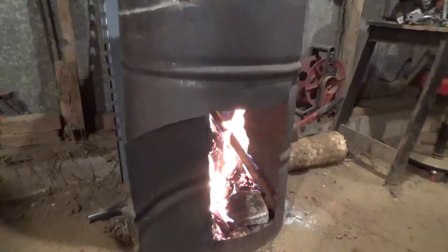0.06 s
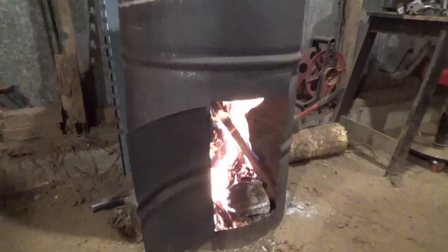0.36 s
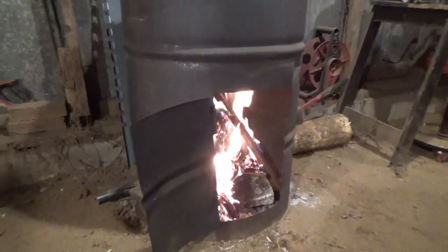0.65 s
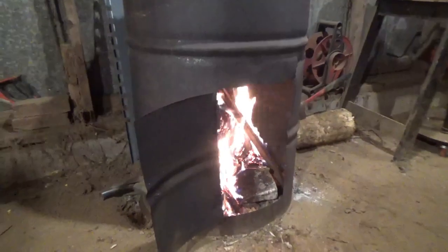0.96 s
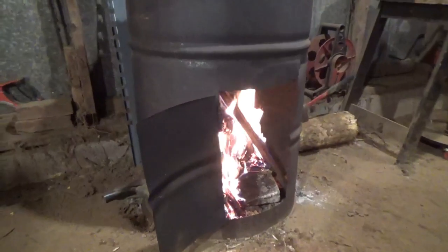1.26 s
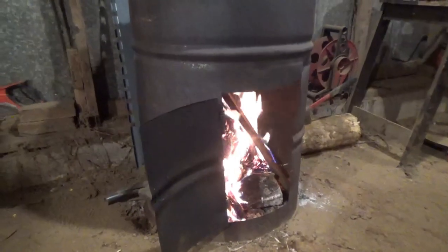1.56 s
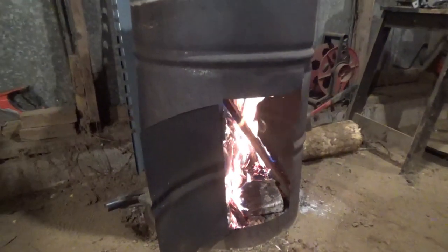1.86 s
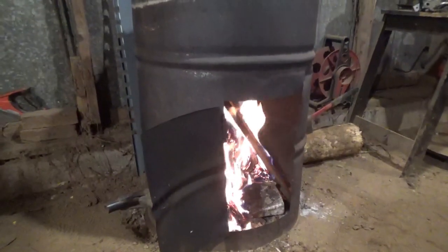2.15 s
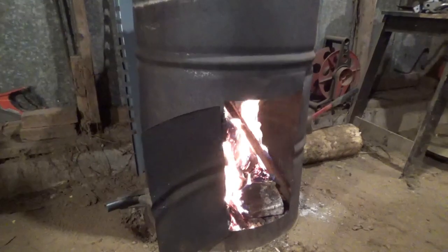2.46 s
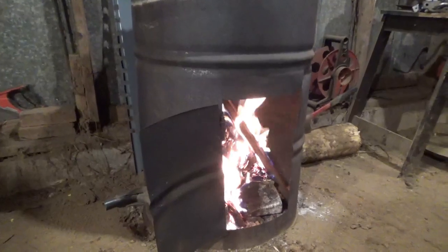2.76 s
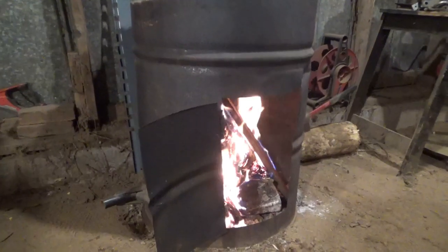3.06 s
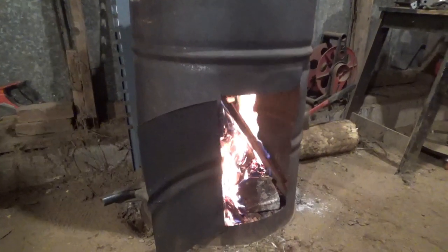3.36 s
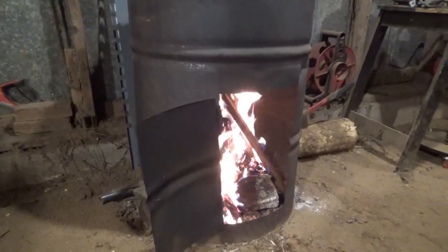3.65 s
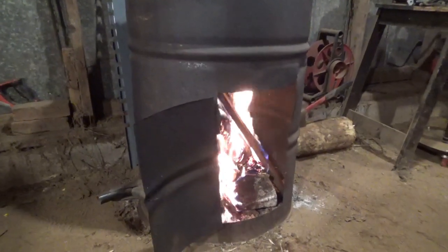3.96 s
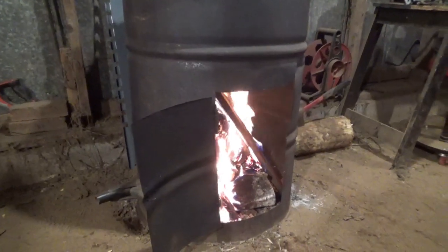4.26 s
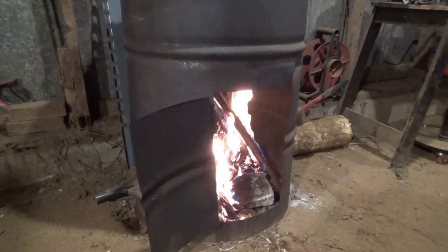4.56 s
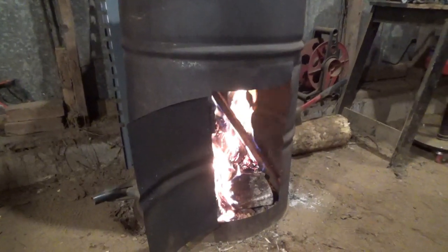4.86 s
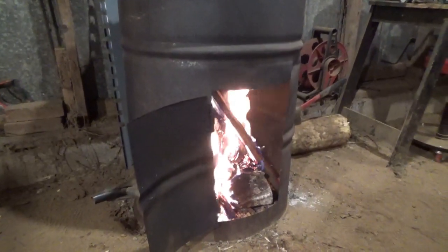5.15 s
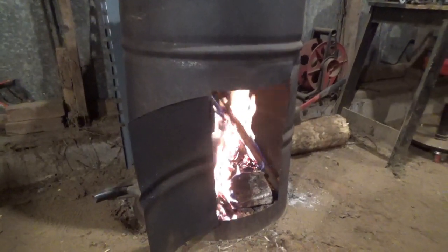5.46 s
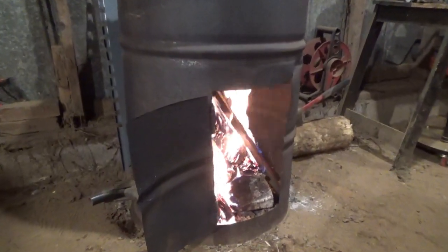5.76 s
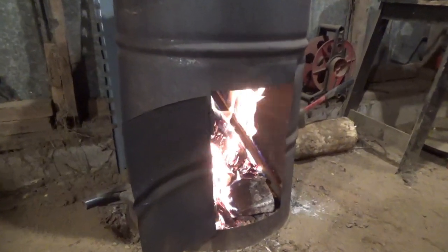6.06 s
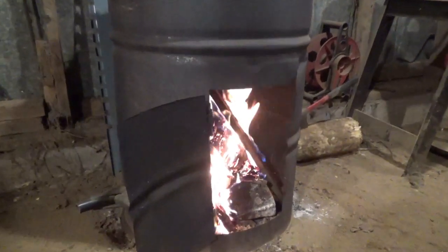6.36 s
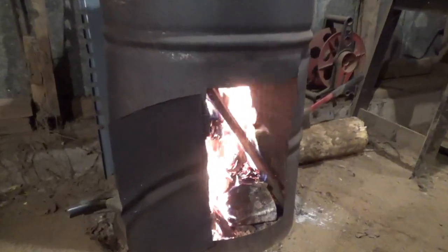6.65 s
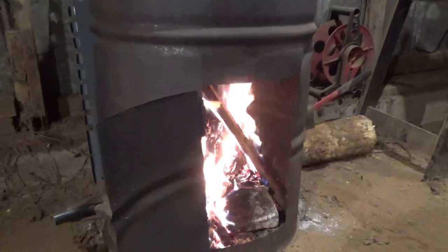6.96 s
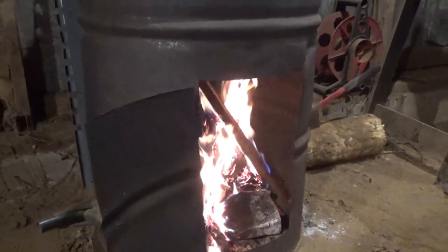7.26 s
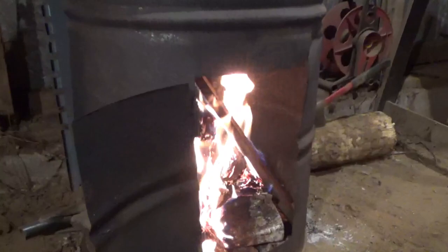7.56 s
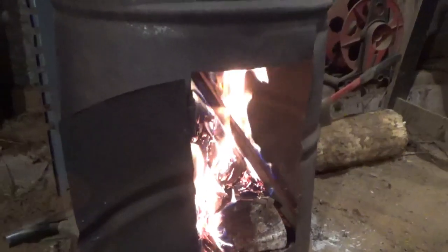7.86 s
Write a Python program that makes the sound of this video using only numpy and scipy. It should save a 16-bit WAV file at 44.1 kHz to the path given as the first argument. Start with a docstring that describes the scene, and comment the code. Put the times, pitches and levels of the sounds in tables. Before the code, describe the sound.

A wood fire burns in a steel drum stove in a workshop, a step from a stereo microphone. A very brief hollow rub opens the scene and stops dead. Throughout, the flames rush softly and the draught hums in the drum, under finely sizzling sap, ticking embers, small spits and a faint thin whine. Sharp, dry snaps stand far above this bed, each with a short echo from the drum and the room, the loudest slightly overloading. They cluster from about 0.5 to 1.5 seconds, return around 2.3 and 2.9, and come in a strong flurry from 3.4 to 3.8. Single pops follow near 4.4, 4.8, 5.9 and 6.2 seconds, then woodier knocks around 6.9 and a last loud group near 7.8. Escaping gas sings faintly in rough, slightly falling whistles, briefly at 3 seconds and then on and off from 4 seconds until almost 8.

```python
"""Sharp snaps of a wood fire, a step from the open door of a steel drum stove in a workshop.
Gas pockets burst in the logs, each with a short wash from the drum and the room, over small spits
and the fine crackle of sap and embers. The draught hums in the drum and escaping gas sings faintly.
A brief hollow rub opens the scene and a thin whine sits close to the stereo microphone,
which overloads on the loudest snaps."""
import sys
import numpy as np
from scipy import signal
from scipy.fft import rfft, irfft, next_fast_len
from scipy.io import wavfile
from scipy.ndimage import uniform_filter1d, minimum_filter1d, map_coordinates

SR = 44100
rng = np.random.default_rng(int(sys.argv[2]) if len(sys.argv) > 2 else 0)


def bounce(signal):
    """Save signal as a 16-bit WAV file at the path given by the first command-line argument."""
    frames = np.transpose(np.atleast_2d(signal))
    limited = np.clip(frames, -1, 1)
    pcm = np.round(limited * 32767).astype(np.int16)
    wavfile.write(sys.argv[1], SR, pcm)


N = 357033
BAND_HZ, TOP_HZ = 11050, 16000  # treble limits before and after the overload

# The larger bursts in the logs, in relative levels. Snap is the top treble, crack lies at 3-6 kHz, and body
# sets the low part around body f: a woody knock, or with a very low body f a deep thump under the snap: t/s,
# snap/dB, crack/dB, body/dB, body f/Hz, echo/dB
BURSTS = [(0.3335, 3.5, -16, -15, 1400, -10.5), (0.4517, -2.5, -24, -27, 1400, -15),
          (0.5241, 0, -12.5, -13, 625, -14), (0.568, 7.5, -3.5, -15.5, 800, -11.5),
          (0.5959, -6, -27, -29, 1400, -10), (0.6494, 9.5, -10, -17, 1400, -8.5),
          (0.679, 19, 2, 0, 1470, -3), (0.765, 0.5, -1.5, -1, 1190, -6), (0.8172, 19, 1, -6.5, 200, -7),
          (0.8394, 13.5, 1.5, -19, 664, -3), (0.8802, -4.5, -7, -20, 1400, -21),
          (0.9644, -2, -10.5, -15, 620, -10.5), (0.9838, -8.5, -9.5, -18, 1400, -19),
          (1.0944, -7, -17.5, -29, 1400, -2.5), (1.2055, -7, -17, -20, 1410, -7),
          (1.2981, 16.5, 2, 4, 40, -9), (1.3827, -5, -18, -26, 1400, -3), (1.4246, 7, -4.5, -9.5, 1320, -7),
          (1.4642, 3.5, -11, -7.5, 1260, -5), (1.5487, 11, 5.5, -6, 1900, -6),
          (1.7466, 0, -16, -20, 1400, -8.5), (2.0846, 8, -7, -12, 1180, -10.5),
          (2.274, 17.5, -3, -14.5, 670, -6.5), (2.4168, 11, -3.5, -15, 1320, -9),
          (2.4787, -7.5, -14, -16, 1400, -13), (2.7036, -5.5, -16, -21, 1400, -4),
          (2.772, -13, -23, -33, 1400, 5.5), (2.8746, -6.5, -21, -30, 1400, -0.5),
          (2.905, -12, -21, -22, 1400, -6), (2.9384, 17.5, 5, 6.5, 1830, -6.5),
          (2.9676, -2, -2.5, -34, 1400, -8), (3.0404, 12, -8.5, -6.5, 1890, -7.5),
          (3.0972, -9, -31, -24, 1400, -16), (3.4192, -19, -12, -14, 1400, -14),
          (3.4536, 15, 2, -7.5, 1290, -9), (3.4796, 8, -4.5, -6, 580, -9.5), (3.5767, 15, 8, -0.5, 260, -4),
          (3.6465, 13.5, 3.5, -5, 1260, -6.5), (3.693, 16.5, 1, -2.5, 626, -3),
          (3.7616, -5, -11, -19, 1400, 1.5), (3.7876, 15, 4.5, -1, 686, -5),
          (3.9326, -0.5, -20, -21, 1400, -3.5), (4.0717, -2.5, -11.5, -17, 1400, -8),
          (4.2347, -25, -17, -22, 1400, -14), (4.3862, 13, -1, -8.5, 1940, -15),
          (4.4742, -4, -13, -18.5, 1400, -5), (4.6716, 3, -12, -10, 766, -8),
          (4.8233, 6, 4, 0, 1260, -11.5), (4.9706, -7, -29, -26, 1400, -5),
          (5.2388, -1, -18, -22.5, 1400, -4), (5.2851, -14, -22, -15.5, 1400, -13),
          (5.7142, -8.5, -16, -31, 1400, -15), (5.7461, -1.5, -11, -22, 1400, -7.5),
          (5.8497, 10.5, -10.5, -24, 1400, -10.5), (5.931, 13.5, -0.5, -9, 1290, -11),
          (6.0404, -10.5, -33, -32, 1400, -7), (6.1449, -10.5, -27, -29, 1400, -5),
          (6.179, 14, 1.5, -1.5, 1170, -9), (6.315, -14, -26, -30, 1400, -20),
          (6.4996, -11, -20.5, -22, 1400, -2), (6.6567, -10, -18.5, -13, 1410, -1.5),
          (6.8592, -5.5, -7.5, 5, 880, -9), (6.9435, 3, 5, 4.5, 905, -11), (6.9528, 7, -9, -3, 830, -13),
          (7.0459, 2.5, -17.5, -41, 1400, -8), (7.3642, -12.5, -16, -17, 1400, -15),
          (7.4911, 2, -5.5, -12, 1290, -5), (7.769, 12.5, 1.5, -16, 723, -14),
          (7.7884, 13, -2.5, -6, 684, -9), (7.8724, 12.5, 8, 8, 1320, -7.5)]


def amp(db):
    """Decibels as an amplitude factor."""
    return 10 ** (np.asarray(db) / 20)


def unit(x):
    """x scaled to an RMS of one."""
    return x / np.sqrt(np.mean(x ** 2) + 1e-20)


def along(points, hz):
    """Interpolate (f/Hz, value) points on a log frequency axis."""
    f, values = np.transpose(points)
    return np.interp(np.log(hz + 1), np.log(f + 1), values)


def curves(rows):
    """One value per sample for each column after t/s."""
    times, *columns = np.transpose(rows)
    return [np.interp(np.arange(N) / SR, times, column) for column in columns]


def wobble(rate):
    """A smooth random curve, rate knots a second."""
    knots = rng.standard_normal(int(N * rate / SR) + 4)
    return map_coordinates(knots, [np.arange(N) * rate / SR])


def filtered(x, response):
    """x through a filter given as a function of frequency."""
    n = x.shape[-1]
    padded = next_fast_len(n + SR // 20)
    return irfft(rfft(x, padded) * response(np.fft.rfftfreq(padded, 1 / SR)), padded)[..., :n]


def resonances(modes, f):
    """Response of (f/Hz, width/Hz, level/dB) modes, summed with alternating signs."""
    return sum((-1) ** k * amp(db) * 1j * f * width / (hz * hz - f * f + 1j * f * width)
               for k, (hz, width, db) in enumerate(modes))


def pulse(spectrum, size=1024):
    """The shortest causal pulse with this (f/Hz, level/dB) spectrum."""
    cepstrum = irfft(np.log(amp(along(spectrum, np.fft.rfftfreq(size, 1 / SR)))))
    cepstrum[1:size // 2] *= 2
    cepstrum[size // 2 + 1:] = 0
    return irfft(np.exp(rfft(cepstrum)))


def pair(n, side_db):
    """White noise at two close microphone ports."""
    mid, side = rng.standard_normal((2, n))
    return np.array([mid + amp(side_db) * side, mid - amp(side_db) * side])


def add(track, start_s, sound):
    """Mix a sound into the track."""
    i = max(round(start_s * SR), 0)
    part = track[:, i:i + sound.shape[-1]]
    part += sound[..., :part.shape[-1]]


def whine(pips_per_s=30, pip_hz=4020, sweep_hz=130, waver_hz=40):
    """A thin whine near the microphone: a narrow band of noise and faint falling pips."""
    # Strength of the whine's two parts: t/s, pip level/dB, steady level/dB
    whine_levels = [(0, -67.5, -66), (1.2, -70, -67.5), (3, -72, -70), (4.3, -67, -70), (6, -78, -72),
                    (6.5, -105, -68), (8.1, -92, -72)]
    pips_db, steady_db = curves(whine_levels)
    cycle = 2 * np.pi * pips_per_s * np.arange(N) / SR
    pitch = pip_hz - sweep_hz * np.sin(cycle) + waver_hz * wobble(200)
    envelope = (.5 + .5 * np.cos(cycle)) ** 2
    pips = unit(envelope * np.sin(2 * np.pi * np.cumsum(pitch) / SR))
    steady = unit(filtered(pair(N, side_db=-4.5), lambda f: resonances([(3546, 480, 0)], f) ** 2))
    return amp(pips_db) * pips + amp(steady_db) * steady


def rub(level_db=-41, end_s=0.0545):
    """A short hollow rubbing sound at the start that stops dead."""
    # Resonances of the rub: f/Hz, width/Hz, relative level/dB
    rub_modes = [(366, 52, -7), (442, 49, -1.5), (844, 71, -5), (980, 63, 0.5), (1800, 130, -17),
                 (2120, 130, -20), (2540, 200, -21)]
    gate = np.clip((end_s - np.arange(N) / SR) / .001, 0, 1)
    hollow = unit(filtered(pair(N, side_db=-13), lambda f: resonances(rub_modes, f)))
    return amp(level_db) * gate * hollow


def flames(drum_db=-5.0):
    """The flames flutter and stir the air in the drum, which hums behind the open door."""
    # Spectrum of the rushing flames: f/Hz, relative level/dB
    rush_spectrum = [(20, -20), (45, -14), (80, -23), (150, -9.5), (230, -2), (400, -1.5), (600, -0.5),
                     (1000, 0), (1500, -5.5), (2300, -9), (3500, -14), (5500, -15), (11000, -23)]
    # Air resonances of the drum: f/Hz, width/Hz, relative level/dB
    drum_modes = [(109.8, 24, 1.5), (307.5, 15.4, -2.5), (485, 18, -9.5), (605, 67, -2), (702, 41, 0),
                  (855, 115, -4.5)]
    # Slow course of the flames: t/s, level/dB
    flame_levels = [(0.0, -49), (0.15, -53.5), (1.9, -56.5), (4.85, -56), (5.6, -55), (8.1, -55.5)]
    level = amp(curves(flame_levels)[0] + 1.14 * wobble(7))
    rush = unit(filtered(pair(N, side_db=-3.5), lambda f: amp(along(rush_spectrum, f))))
    hum = unit(filtered(pair(N, side_db=-17), lambda f: resonances(drum_modes, f)))
    return level * (rush + amp(drum_db + 0.97 * wobble(9)) * hum)


def jets(sag_hz_per_s=30, attack_s=0.036, release_s=0.08, waver_hz=6, flutter_db=1.5, rough=0.49):
    """Gas forced out of the logs whistles in a rough tone that sags as the pressure falls."""
    # Jets singing in cracks: t/s, length/s, starting f/Hz, level/dB
    whistles = [(3.03, 0.17, 775, -61), (4.18, 0.36, 722, -62), (4.55, 0.7, 872, -63.5),
                (5.2, 0.48, 603, -61.5), (5.4, 0.89, 871, -61.5), (5.53, 0.42, 845, -60),
                (5.95, 0.11, 547, -54), (6.16, 0.11, 542, -51.5), (6.27, 0.47, 817, -58),
                (6.95, 0.36, 718, -64.5), (7.25, 0.65, 795, -67)]
    out, t = np.zeros(N), np.arange(N) / SR
    for start, length, hz, db in whistles:
        age = t - start
        opening = np.clip(np.minimum(age / attack_s, (length - age) / release_s), 0, 1)
        pitch = hz - sag_hz_per_s * age + waver_hz * wobble(40)
        phase = 2 * np.pi * np.cumsum(pitch) / SR
        tone = (1 + rough * wobble(55)) * np.sin(phase) + rough * wobble(55) * np.cos(phase)
        out += opening * amp(db) * unit(tone)
    return out * amp(flutter_db * wobble(10))


def echo(early_db=7.5, early_t60=0.02):
    """A fresh impulse response: quick reflections in the ringing drum, then the workshop."""
    # Reverberation of the workshop: f/Hz, t60/s
    room_t60 = [(200, 0.32), (1000, .3), (4000, 0.26), (11000, 0.2)]
    # Colour of the reflections: f/Hz, gain/dB
    colour = [(60, -17), (250, -8), (600, 3.5), (1200, 2), (2200, 3.5), (4000, 3), (6000, 2.5), (8000, -5),
              (11000, -3)]
    # Faint ringing of the steel wall: f/Hz, width/Hz, level/dB
    steel_modes = [(510, 87, 2), (610.5, 15, 6), (1194, 77, -1.5), (1496, 81, -10), (1684, 8.9, -5),
                   (1796, 8.3, -18), (1890, 18, -22), (2010, 49, -3), (2863, 17, -1), (3060, 12, -16)]
    hz, t, bands = signal.stft(pair(SR // 3, side_db=-9.5), SR, nperseg=128)
    decay = amp(-60 * t / along(room_t60, hz)[:, None])
    tail = signal.istft(bands * decay, SR, nperseg=128)[1]
    t = np.arange(tail.shape[1]) / SR
    tail = tail / np.linalg.norm(tail[0]) * (1 + amp(early_db - 60 * t / early_t60))
    ring = lambda f: 1 + sum(resonances([mode], f) for mode in steel_modes)
    onset = 1 - np.exp(-t / 0.001)
    return filtered(tail, lambda f: amp(along(colour, f)) * ring(f)) * onset


def sizzle_level(flare_db=-65.5, fade_s=0.065):
    """The sap boils steadily and flares briefly wherever a larger burst opens fresh wood."""
    # Steady boiling of the sap: t/s, level/dB
    boil_levels = [(0.0, -78), (0.12, -57.5), (1.2, -61.5), (4.2, -60), (5.5, -63.5), (7.5, -62),
                   (8.1, -60.5)]
    flare_power, t = np.zeros((1, N)), np.arange(SR) / SR
    for start, snap_db, *_ in BURSTS:
        add(flare_power, start, (amp(flare_db + snap_db) * np.exp(-t / fade_s)) ** 2)
    return np.sqrt(amp(curves(boil_levels)[0]) ** 2 + flare_power[0])


def crackle(ticks_per_s=70, spread_db=6.5, tick_db=-36, echo_db=-7, hiss_db=0.5):
    """Boiling sap sizzles, with countless tiny ticks in the embers."""
    # Colour of the sizzle and the ticks: f/Hz, gain/dB
    sizzle_spectrum = [(1500, -23.5), (5000, -14), (6500, -21.5), (8000, -9), (9500, -5), (11000, -14.5)]
    colour = lambda f: amp(along(sizzle_spectrum, f))
    chance, size = rng.random(N), rng.exponential(size=N)
    ticks = (chance < ticks_per_s / SR) * amp(tick_db + spread_db * np.minimum(size, 4))
    ticks = ticks + amp(echo_db) * signal.fftconvolve(ticks[None], echo(), axes=1)[:, :N]
    hiss = unit(filtered(pair(N, side_db=-12.5), lambda f: colour(f) * (f < BAND_HZ)))
    flicker = amp(hiss_db + 0.17 * wobble(12) + 3.2 * wobble(150))
    return filtered(ticks, colour) + hiss * sizzle_level() * flicker


def burst(snap_db, crack_db, body_db, body_hz, echo_db, tear_db=-3, tear_t60=0.0062):
    """A pocket bursts: a pressure pulse and a few ms of tearing fibres, with a low body and the echo."""
    thump_db = body_db - 25.5  # a low thump under the snap
    body = [(body_hz * 0.03, thump_db - 2), (body_hz * 0.15, thump_db), (body_hz * 0.63, body_db - 3),
            (body_hz, body_db + 2.5), (body_hz * 1.8, (body_db + crack_db) / 2 - 1)]
    edge = [(3300, crack_db), (5600, crack_db + 1), (7800, snap_db + 1),
            (9800, snap_db), (11500, snap_db - 3), (16000, snap_db - 12)]
    t = np.arange(SR // 100) / SR
    tear = pair(len(t), side_db=-17.0) * amp(-60 * t / tear_t60)
    direct = amp(tear_db) * tear / np.linalg.norm(tear[0])
    direct[:, 0] += 1  # the pressure pulse
    sound = amp(echo_db - 1) * echo()
    add(sound, 0, direct / np.linalg.norm(direct[0]))
    return signal.fftconvolve(sound, pulse(body + edge)[None], axes=1)


def spits(spits_per_s=6, max_count=90, spread_db=3.5):
    """Small pockets burst at random moments, each with its own mix of snap, crack and body."""
    out = np.zeros((2, N))
    times = np.cumsum(rng.exponential(size=max_count)) / spits_per_s
    offsets_db = spread_db * np.sqrt(3) * rng.uniform(-0.93, 1, (max_count, 3))
    for start, (snap, crack, body) in zip(times, offsets_db):
        add(out, start, burst(snap - 17, crack - 29.5, body - 28.5, body_hz=1390, echo_db=-7))
    return out


def pops():
    """The larger gas pockets burst one by one, a step from the microphone."""
    out = np.zeros((2, N))
    for start, *voice in BURSTS:
        add(out, start, burst(*voice))
    return out


def scene():
    """The stove at the two microphone ports, with the snapping wood a touch to the left."""
    # How much the two ports differ: f/Hz, side gain/dB
    stereo_width = [(60, -2), (140, -8.5), (280, -9.5), (600, -2.5), (2000, 1), (4000, 1.5), (8000, -1)]
    wood = (pops() + spits() + crackle()) * amp([[.3], [-.3]])
    left, right = wood + flames() + jets() + whine() + rub()
    mid = (left + right) / 2
    side = filtered((left - right) / 2, lambda f: amp(along(stereo_width, f)))
    return np.array([mid + side, mid - side])


def record(dry, ceiling=2.0, knee=4, window=9):
    """The microphone chain: steep treble cut, fast limiter, soft overload of the tips, upper limit."""
    heard = filtered(dry, lambda f: 1 / np.sqrt(1 + (f / BAND_HZ) ** 180))
    gain = np.minimum(1, ceiling / (np.abs(heard).max(axis=0) + 1e-9))
    limited = heard * uniform_filter1d(minimum_filter1d(gain, window), window)
    rounded = limited / (1 + np.abs(limited) ** knee) ** (1 / knee)
    return filtered(rounded, lambda f: 1 / np.sqrt(1 + (f / TOP_HZ) ** 80))


dry = scene()
out = record(dry)
bounce(out)
```